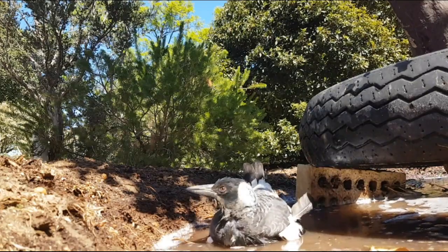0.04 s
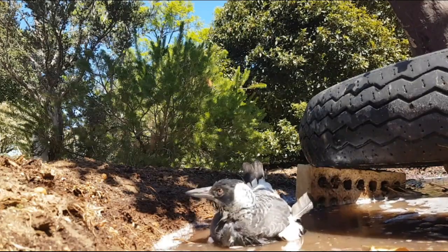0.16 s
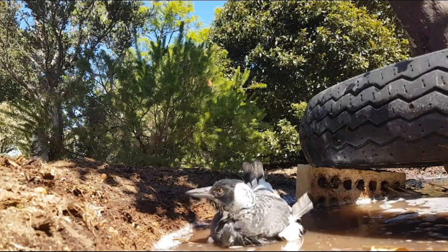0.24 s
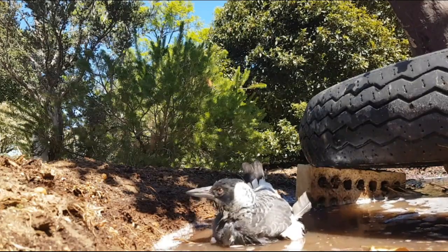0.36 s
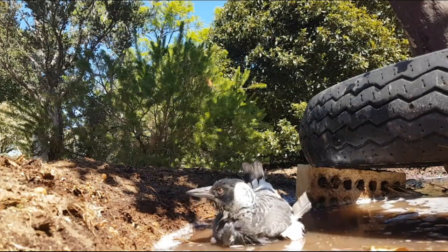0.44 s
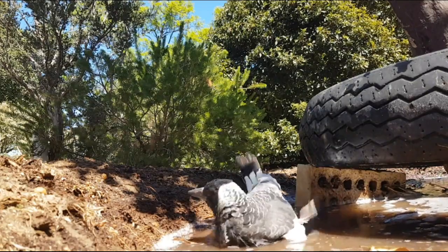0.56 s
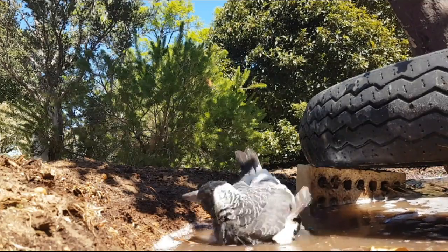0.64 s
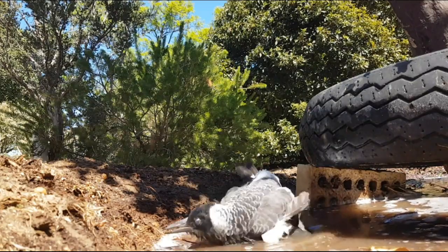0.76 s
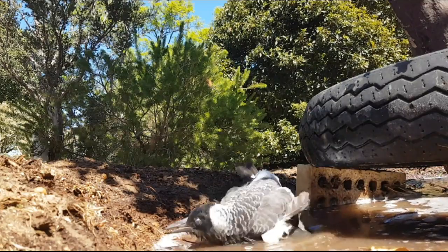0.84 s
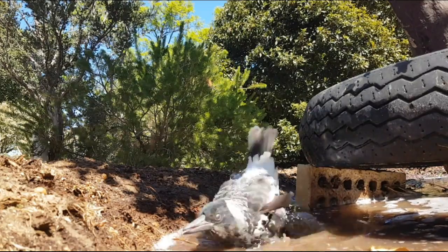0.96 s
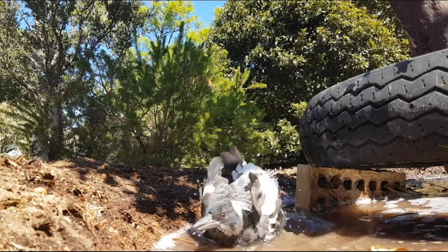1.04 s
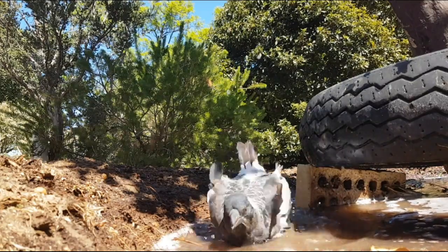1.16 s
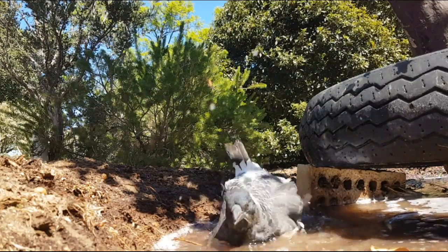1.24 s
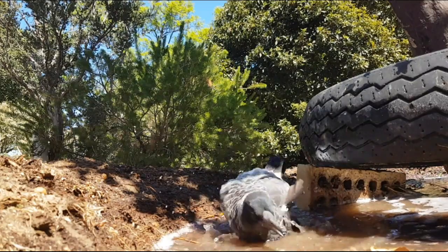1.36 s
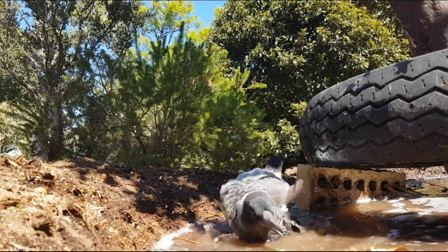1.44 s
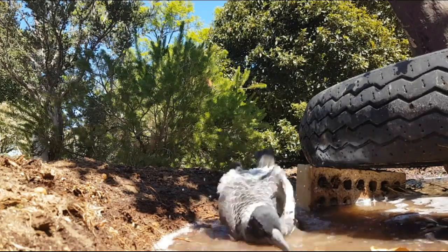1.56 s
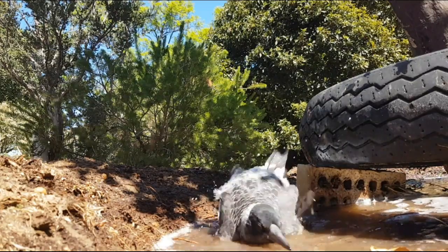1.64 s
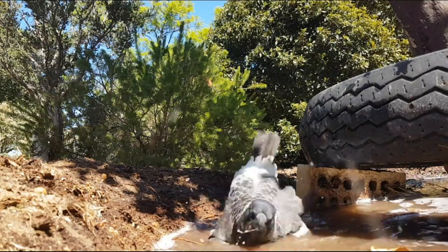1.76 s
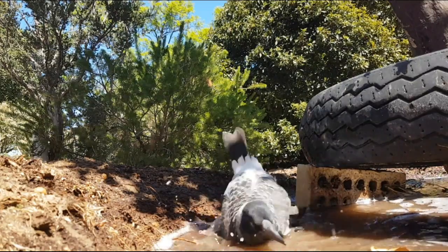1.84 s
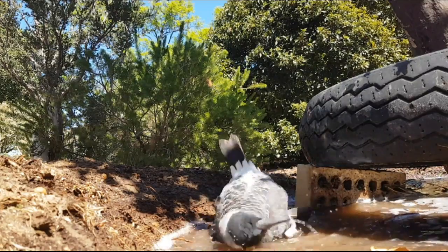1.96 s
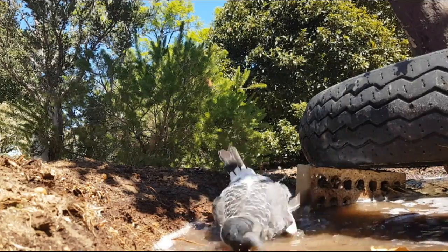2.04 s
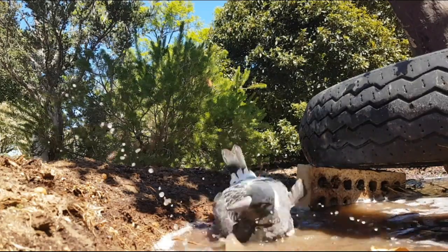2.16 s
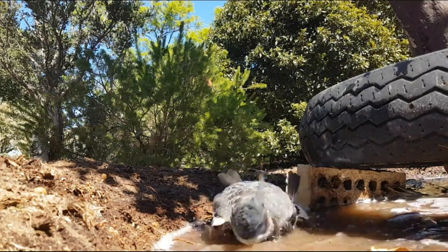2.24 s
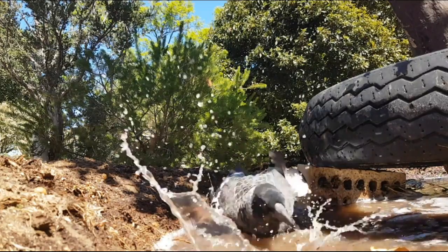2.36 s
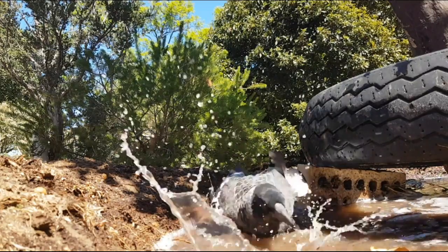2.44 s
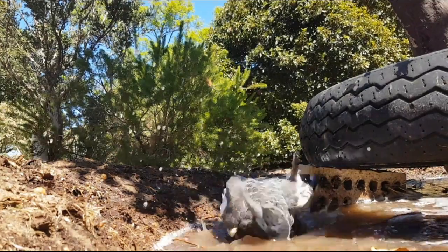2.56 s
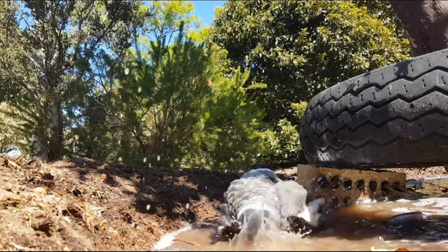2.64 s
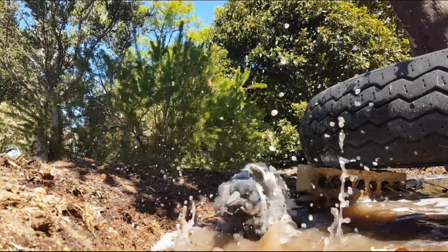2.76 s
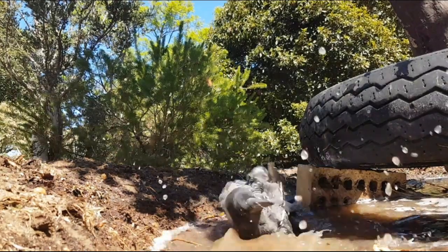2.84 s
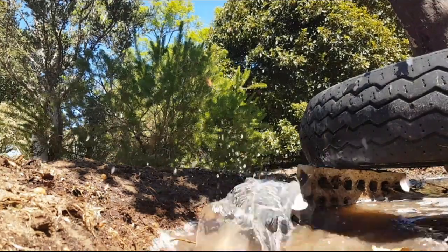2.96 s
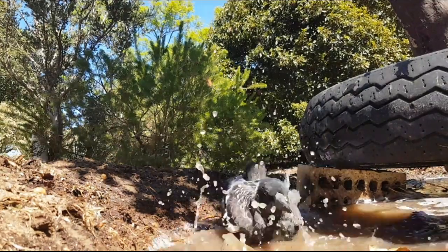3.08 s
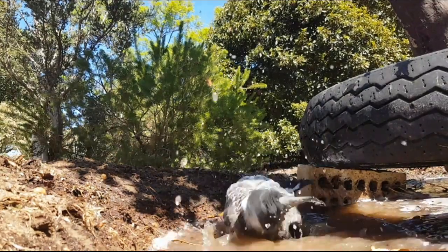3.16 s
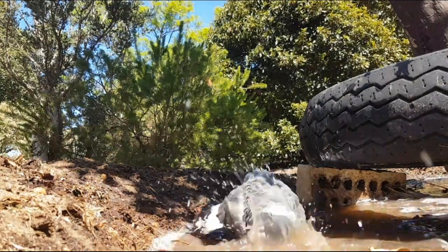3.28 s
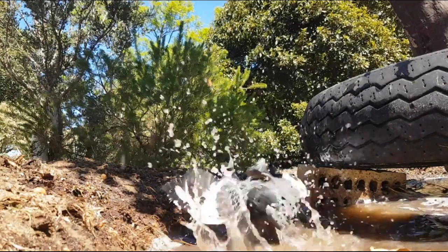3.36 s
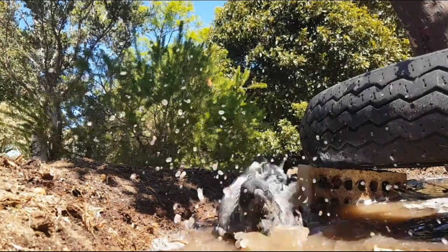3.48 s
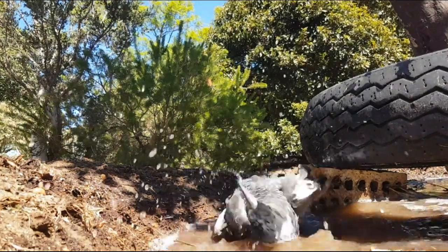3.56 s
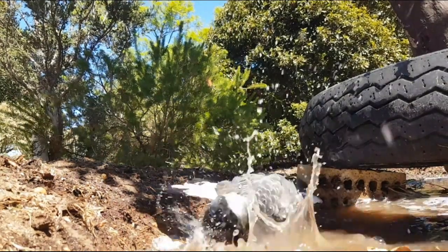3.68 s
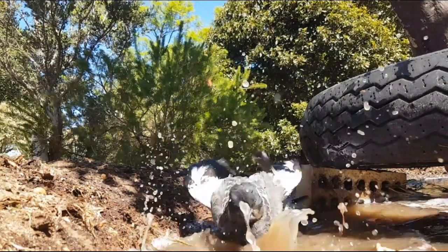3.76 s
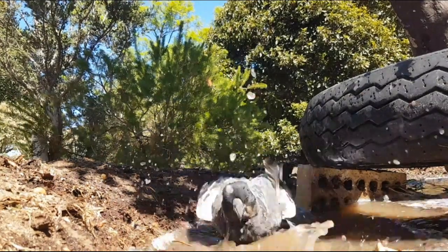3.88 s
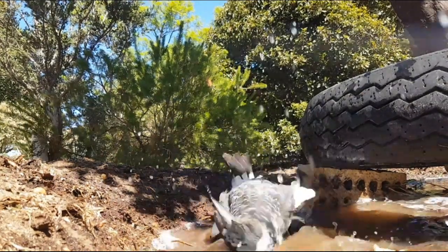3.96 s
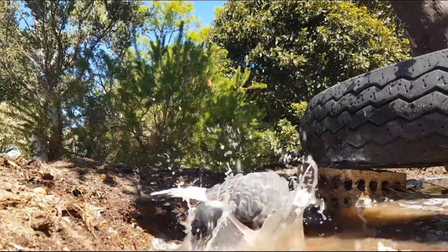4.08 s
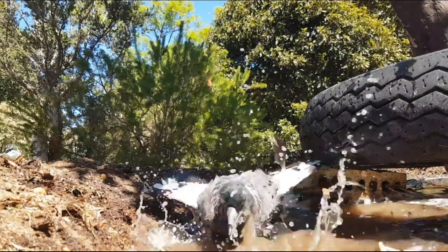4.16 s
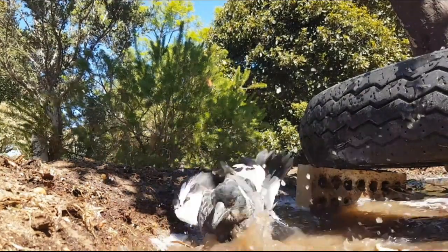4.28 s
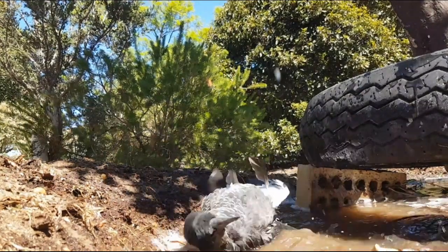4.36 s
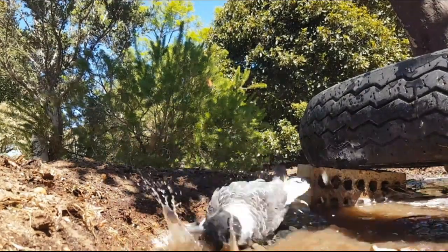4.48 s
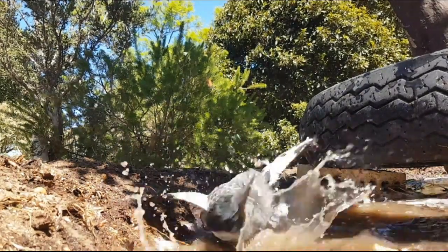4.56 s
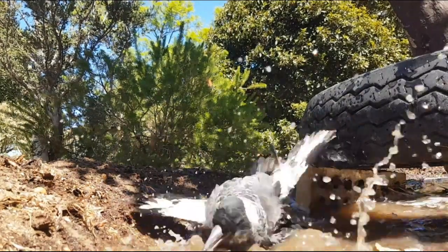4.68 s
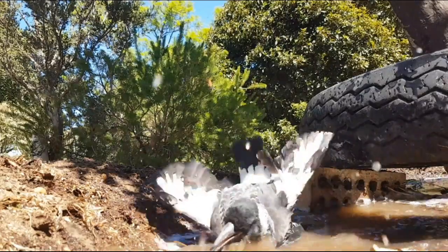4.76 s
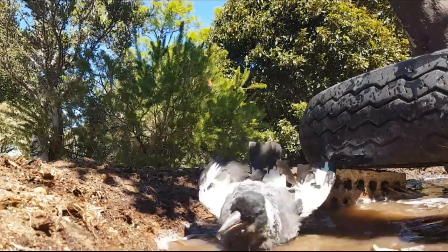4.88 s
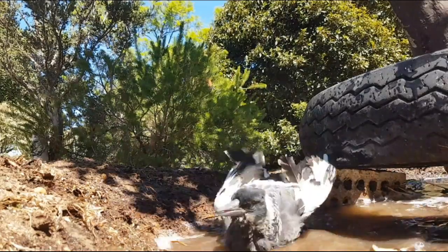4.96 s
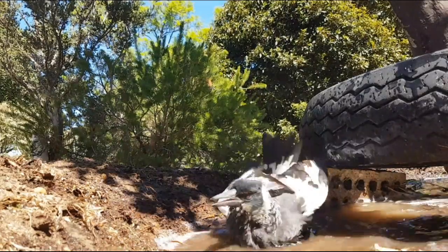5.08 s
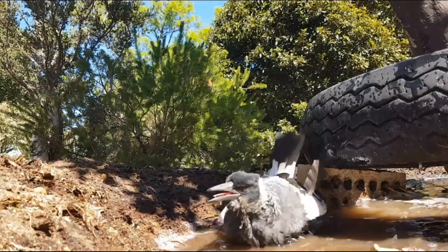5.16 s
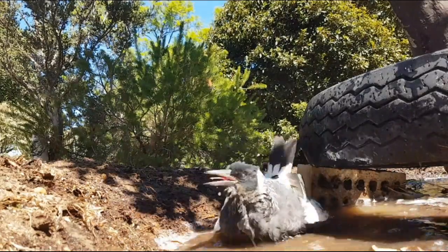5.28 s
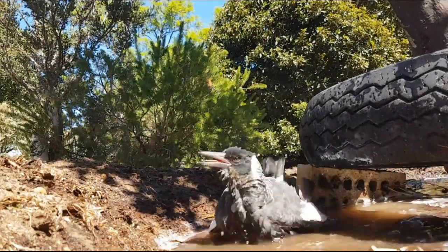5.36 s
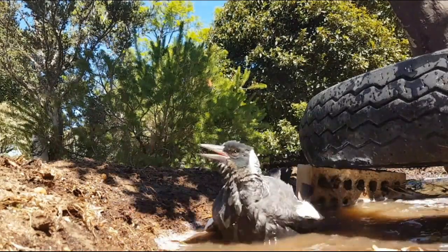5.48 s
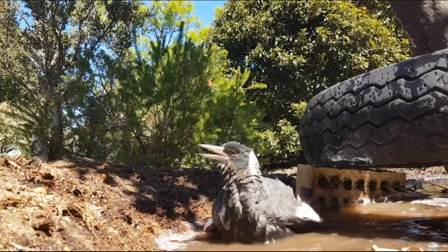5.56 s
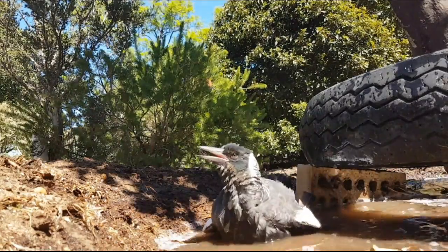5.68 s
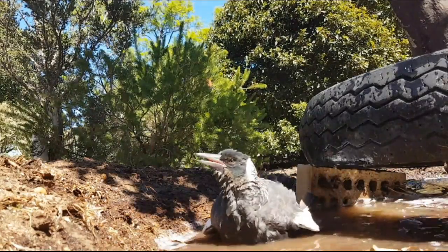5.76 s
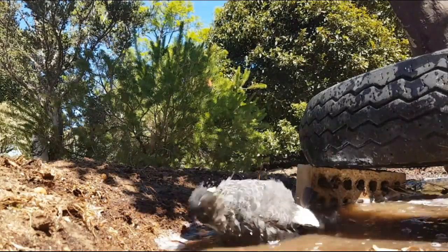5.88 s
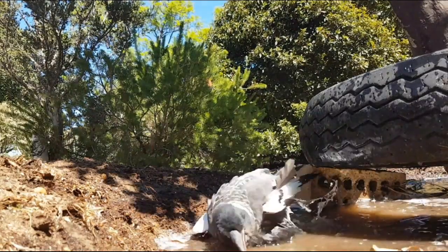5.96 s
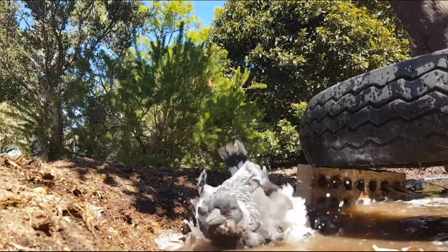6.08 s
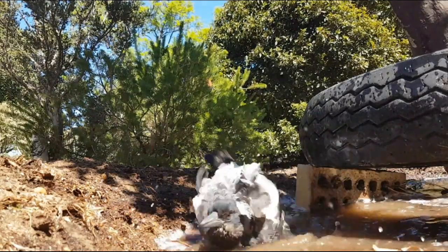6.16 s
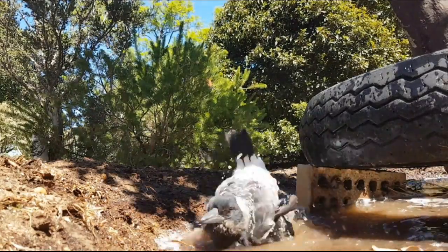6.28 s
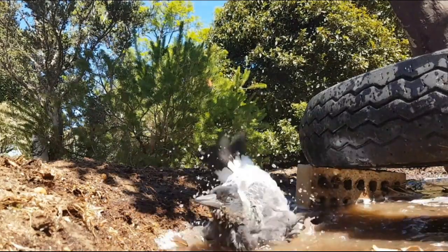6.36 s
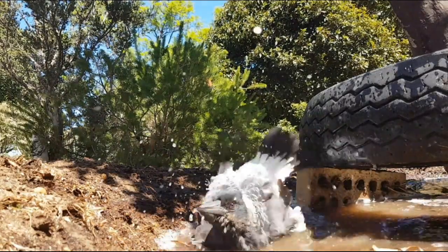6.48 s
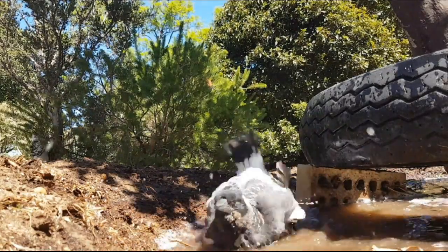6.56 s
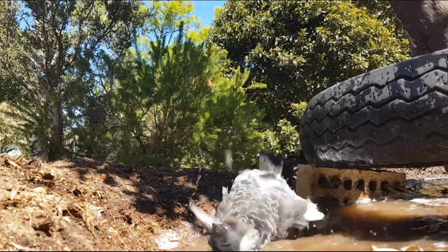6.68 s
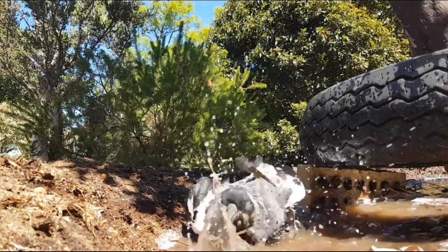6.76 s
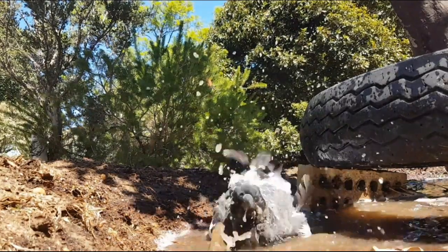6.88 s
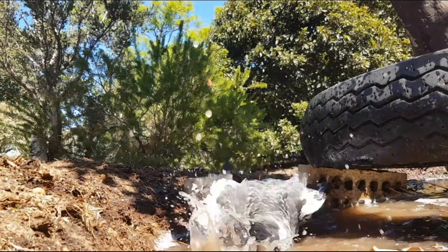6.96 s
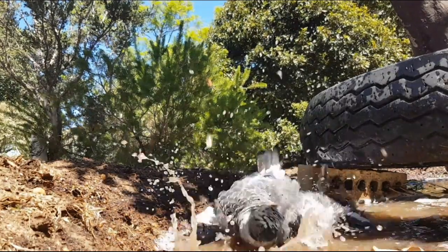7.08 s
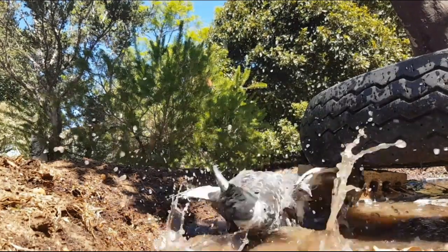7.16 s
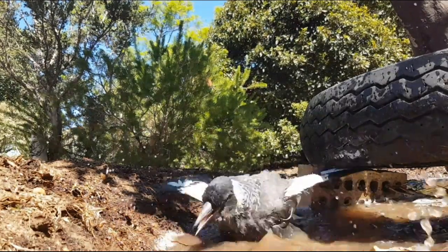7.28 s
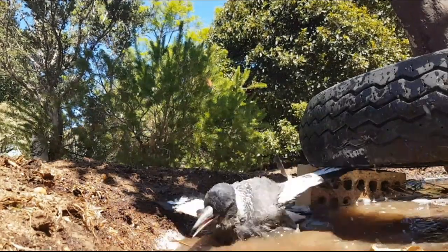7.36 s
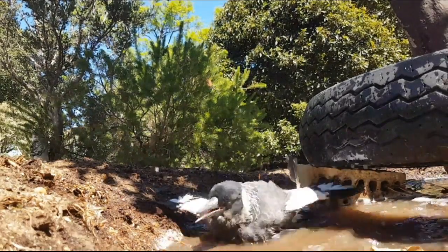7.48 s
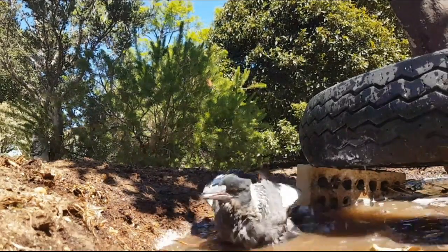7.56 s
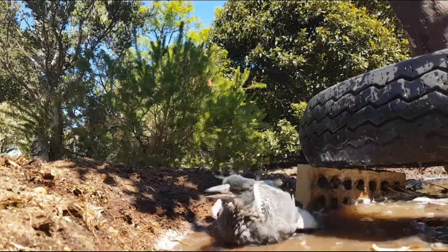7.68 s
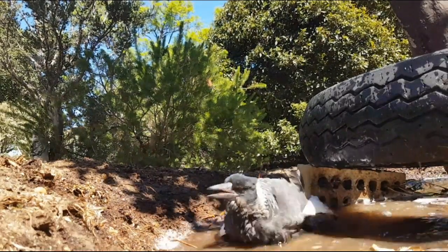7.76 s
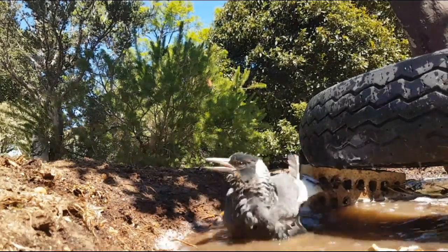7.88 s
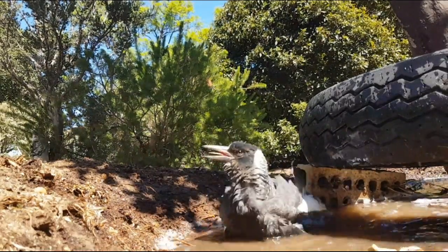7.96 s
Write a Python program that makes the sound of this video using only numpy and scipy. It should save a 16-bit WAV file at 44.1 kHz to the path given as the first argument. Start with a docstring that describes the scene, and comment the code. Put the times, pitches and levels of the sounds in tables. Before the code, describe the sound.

A bird bathes in a shallow puddle outdoors, close to a small microphone. The first second is nearly quiet, then light drips and plinks begin. At about 2 seconds a sharp wing slap hits the water, and from 2.5 to 5 seconds quick, irregular splashes follow, with low sloshing, pinging bubbles and fine spattering spray, strongest between 3.4 and 4.5 seconds. The water settles in a lull from about 5.1 to 6 seconds. A second, shorter bout builds from 6.3 seconds and ends with a clear rising plop near 7.5, followed by one small splash just before 8 seconds. A dull, fluttering background noise swells with the splashes. Far away, another bird gives very faint thin whistles around 4, 5 and 6 seconds, and a faint low hum comes up briefly around 6.3 seconds.

```python
"""Bird bathing in a puddle

A bird bathes in two bouts, close to a small microphone. Its wings slap the shallow water and trap
air, bubbles ping and spray spatters. The recorder's noise suppressor lets dull background noise up
with the splashes, and its audio coder and suppressor make that noise flutter. Far off, another bird
whistles and something hums."""
import sys
import numpy as np
from scipy import signal
from scipy.fft import rfft, irfft
from scipy.io import wavfile
from scipy.ndimage import uniform_filter1d

SR = 44100
rng = np.random.default_rng(int(sys.argv[2]) if len(sys.argv) > 2 else 0)


def inscribe(sig):
    """Save sig as 16-bit PCM at rate SR to the path in sys.argv[1].

    A 1-D sig is mono; a 2-D sig holds one channel per row.
    Samples are clipped to [-1, 1] before scaling.
    """
    pcm = np.round(np.clip(np.atleast_2d(sig).T, -1, 1) * 32767)
    wavfile.write(sys.argv[1], SR, pcm.astype(np.int16))


N = 353990


def gain_of(db):
    """Turns decibels into a factor."""
    return 10 ** (np.asarray(db) / 20)


def unit_rms(x):
    """Scales to an rms of one."""
    return x / np.sqrt(np.mean(x ** 2) + 1e-20)


def unit_band_rms(x, low_hz, high_hz):
    """Scales x so that one band of it has an rms of one."""
    power, bins = abs(rfft(x)) ** 2, np.fft.rfftfreq(len(x), 1 / SR)
    return unit_rms(x) * np.sqrt(power.sum() / power[(bins > low_hz) & (bins < high_hz)].sum())


def curve(table, column=1):
    """One column of a table over time, for every sample."""
    rows = np.vstack(table)
    return np.interp(np.arange(N) / SR, rows[:, 0], rows[:, column])


def coloured(x, spectrum):
    """Filters x by (Hz, dB) points joined on a log-frequency axis."""
    hz, db = np.transpose(spectrum)
    bins = np.fft.rfftfreq(len(x), 1 / SR)
    return irfft(rfft(x) * gain_of(np.interp(np.log(bins + 1), np.log(hz + 1), db)), len(x))


def noise(spectrum):
    """Coloured noise with an rms of one."""
    return unit_rms(coloured(rng.standard_normal(N), spectrum))


def wander(cutoff_hz):
    """Smooth random drift with an rms of one."""
    knots = rng.standard_normal(N // 100 + 2)
    lowpass = signal.butter(2, cutoff_hz, fs=SR / 100, output="sos")
    smooth = signal.sosfiltfilt(lowpass, knots, padtype="even")
    return np.interp(np.arange(N) / 100, np.arange(len(knots)), unit_rms(smooth))


def swells(base_db, rows):
    """Level in dB of a base plus the power of swells (time s, peak dB, rise dB/s, fall dB/s)."""
    t = np.arange(0, N, 50) / SR
    power = sum(gain_of(2 * (db - np.maximum(rise * (at - t), fall * (t - at))))
                for at, db, rise, fall in rows)
    return 10 * np.log10(gain_of(2 * base_db) + np.interp(np.arange(N) / SR, t, power))


def add(mix, start_s, sound):
    """Mixes a sound in at its start time."""
    part = mix[round(start_s * SR):][:len(sound)]
    part += sound[:len(part)]


# A low hum, far from the puddle: (time [s], level [dB])
HUM_LEVELS = [(5.5, -100), (5.7, -72.5), (6.15, -66), (6.3, -61), (6.5, -64), (6.7, -100), (7.5, -100),
              (7.7, -70.5), (8.03, -101)]


def far_hum(hz=192):
    """One low, wavering tone that comes up twice."""
    t = np.arange(N) / SR
    return gain_of(curve(HUM_LEVELS) + 2.5 * wander(8)) * np.sin(2 * np.pi * hz * t)


# Another bird, far off: (time [s], length [s], level [dB], start pitch [Hz], end pitch [Hz])
FAR_WHISTLES = [(.29, 0.14, -86, 4900, 4600), (.46, 0.08, -81, 4250, 4000), (4.023, 0.055, -66, 3920, 4300),
                (4.95, 0.12, -70, 4750, 4950), (5.73, 0.13, -82, 5250, 4900), (5.77, 0.22, -78, 4600, 4250),
                (5.81, 0.13, -77, 4000, 3850)]


def far_bird():
    """Thin gliding whistles; a raspy voice smears their pitch."""
    out, rasp_hz = np.zeros(N), 230 * wander(190)
    for start, length, db, from_hz, to_hz in FAR_WHISTLES:
        n = round(length * SR)
        hz = np.linspace(from_hz, to_hz, n) + rasp_hz[round(start * SR):][:n]
        add(out, start, gain_of(db) * np.hanning(n) * np.sin(2 * np.pi * np.cumsum(hz) / SR))
    return out


# Levels at the microphone between surges: (time [s], background [dB], spray [dB])
BATHING_LEVELS = [(0.0, -61.5, -94), (0.43, -63, -105), (1.05, -63, -90), (1.14, -57.5, -75),
                  (1.9, -57, -73.5), (2.4, -62, -69), (2.75, -53.5, -67.5), (3.6, -55, -66),
                  (4.3, -50.5, -65.5), (4.42, -58, -61.5), (4.9, -56.5, -69.5), (5.15, -62, -74.5),
                  (6.05, -64, -93.5), (6.35, -59, -81), (6.65, -54, -64.5), (7.05, -58.5, -77.5),
                  (7.45, -52.5, -62.5), (7.7, -61.5, -81), (8.03, -63.5, -91)]
# The body heaves and the puddle surges: (time [s], slosh [dB], background let up [dB], spray [dB])
BODY_SURGES = [(0.483, -79, -61, -92), (1.41, -69, -76, -87), (2.01, -61, -58, -64.5),
               (2.53, -54, -59, -85), (2.83, -51.5, -52.5, -70), (3.15, -56.5, -47, -77),
               (3.495, -49.5, -46.5, -62), (3.73, -71, -70, -71), (3.84, -48.5, -52, -82),
               (3.92, -78, -60, -76), (4.2, -54, -73, -82), (4.665, -52, -52.5, -84), (4.86, -60, -73, -59),
               (5.068, -53.5, -58, -86), (5.325, -66, -55.5, -88), (5.42, -78, -57, -84),
               (5.9, -85, -58.5, -76), (6.158, -84, -55.5, -71), (6.304, -73, -53.5, -63),
               (6.44, -77, -57.5, -64.5), (6.59, -64.5, -57, -78), (6.918, -59, -55.5, -84),
               (7.11, -65.5, -60, -78), (7.357, -56.5, -46.5, -59), (7.882, -66.5, -55.5, -80),
               (7.989, -90, -58.5, -71)]
SURGE_DB_PER_S = (250, 173)  # rise and fall of background and spray
# Background noise behind the puddle: (frequency [Hz], relative level [dB])
BACKGROUND_SPECTRUM = [(18, -62), (48, -29.5), (141, -17.5), (190, -9), (280, -15), (370, -2), (435, -2.5),
                       (520, -7), (640, -8.5), (1150, -15), (1550, -6.5), (2600, -16.5), (4080, -29),
                       (6700, -43.5), (16000, -41.5)]


def background_noise():
    """Dull noise that the recorder's noise suppressor lets up with each splash, at the listed times."""
    dull = unit_band_rms(noise(BACKGROUND_SPECTRUM), 170, 4500)
    base_db = curve(BATHING_LEVELS)
    let_up_db = swells(base_db, [(at, db, *SURGE_DB_PER_S) for at, _, db, _ in BODY_SURGES])
    flutter_db = np.interp(base_db, [-64, -56], [1.9, 3])
    return gain_of(let_up_db + flutter_db * wander(95)) * dull


# Gusts right on the microphone: (time [s], peak level [dB], rise and fall [dB/s])
WIND_GUSTS = [(0.54, -66, 190), (1.7, -67, 27), (2.52, -74, 38), (5.1, -78, 60), (6.84, -60, 158),
              (7.47, -86, 60)]
# Their rumble at the capsule: (frequency [Hz], relative level [dB])
WIND_SPECTRUM = [(15, -7), (30, -8), (60, -2.5), (90, 0.5), (160, -38.5)]


def wind(calm_db=-89.5):
    """Moving air rumbles on the microphone in soft gusts."""
    level_db = swells(calm_db, [(at, db, pace, pace) for at, db, pace in WIND_GUSTS])
    return gain_of(level_db) * noise(WIND_SPECTRUM)


# Water heaving in the puddle, close by: (frequency [Hz], relative level [dB])
SLOSH_SPECTRUM = [(40, -22.5), (80, -3.5), (130, 7.5), (200, 1.5), (320, 8.5), (600, -37)]


def slosh(under_background_db=17, db_per_s=(280, 340)):
    """Low lumps of water, pushed about by the bird's body."""
    heaves = [(at, db, *db_per_s) for at, db, _, _ in BODY_SURGES]
    level_db = swells(curve(BATHING_LEVELS) - under_background_db, heaves)
    return gain_of(level_db + 2.5 * wander(26)) * noise(SLOSH_SPECTRUM)


def ping(db, hz, t60, glide, attack_s):
    """A bubble's dying sine; a positive glide lifts the pitch as it nears the surface."""
    t = np.arange(round(t60 * SR) + 50) / SR
    settle_s = np.interp(db, [-31, -27], [.025, .007])  # a strong bubble levels off early
    cycles = hz * (t + glide * settle_s * (t - settle_s * (1 - np.exp(-t / settle_s))))
    climb = max(glide * min(t60, 2 * settle_s), 0)
    fade_db = 60 * (t / t60) ** (1 + .5 * climb)  # a long climb holds, then dies abruptly
    return -gain_of(db - fade_db) * (1 - np.exp(-t / attack_s)) * np.sin(2 * np.pi * cycles)


def spray_strength():
    """How much spray flies, in dB: the bathing, and more at each surge."""
    surges = [(at, db, *SURGE_DB_PER_S) for at, _, _, db in BODY_SURGES]
    return swells(curve(BATHING_LEVELS, column=2), surges)


# Fine spray falling near the microphone: (frequency [Hz], relative level [dB])
SPRAY_SPECTRUM = [(500, -12.5), (1500, -22.5), (3000, -12), (4500, -7), (7000, -7.5), (10000, -15.5),
                  (16000, -17.5)]


def fine_spray(drops_per_s=45):
    """Tiny drops land at each of 14 pitches, every one a brief tick, over a thin hiss."""
    drops = np.zeros(N)
    for hz in np.geomspace(2500, 15000, num=14):
        landings = rng.random(N) < drops_per_s / SR
        sizes = gain_of(3.2 * np.minimum(rng.exponential(1, N), 3.5))
        tick = ping(0, hz, t60=34 / hz, glide=0, attack_s=3 / hz) * np.sqrt(hz)
        drops += signal.oaconvolve(landings * sizes, tick)[:N]
    grains = unit_rms(drops) + 0.5 * rng.standard_normal(N)
    patter = unit_band_rms(coloured(grains, SPRAY_SPECTRUM), 2300, 14000)
    return gain_of(spray_strength() - 8.5 + 5.3 * wander(30)) * patter


def tiny_bubbles():
    """Short plinks, born in clumps and more often the stronger the spray."""
    out, spray_db = np.zeros(N), spray_strength()
    clumping = np.exp(1.2 * wander(120) - .7)
    births_per_s = 15 * np.clip((spray_db + 80) / 9, 0, 1) * clumping
    for hz in np.geomspace(1500, 10000, num=30):
        births = rng.random(N) < births_per_s / SR
        strengths = gain_of(3.5 * np.minimum(rng.exponential(1, N), 3.3))
        cycles, glide = rng.uniform(5, 24), rng.uniform(0, 25)
        plink = ping(-1.5 * np.log2(hz / 3500), hz, cycles / hz, glide, attack_s=.0002)
        out += signal.oaconvolve(births * strengths, plink)[:N]
    return gain_of(spray_db + 14) * out


# Sheets of spray bursting or landing around the bird, close to the microphone:
# (time [s], level [dB], 60 dB decay [s], treble tilt [dB/octave], pitch where the tilt begins [Hz])
SPRAY_SHEETS = [(1.173, -48, 0.015, -3, 2480), (1.273, -53.5, 0.24, -4, 2720),
                (1.351, -48.5, 0.026, -35, 4250), (1.3681, -46, 0.012, -7, 4290),
                (1.514, -45.5, 0.012, 1, 6940), (1.5713, -40, 0.019, -19, 4240),
                (1.9889, -25, 0.0035, -61, 2160), (2.019, -27.5, 0.0068, -52, 2840),
                (2.179, -45.5, 0.051, -2, 2600), (2.336, -49.5, 0.016, -25, 2670),
                (2.404, -50, 0.03, -14, 3133), (2.5138, -44.5, 0.019, -1, 4050),
                (2.5828, -33, 0.021, -6.5, 2590), (2.6176, -51, 0.018, -5, 3700),
                (2.7038, -43.5, 0.046, -1, 3130), (2.757, -54, 0.0056, -9, 2560),
                (2.812, -26, 0.0081, -3, 4340), (2.8769, -31, 0.048, -3, 2320),
                (3.0088, -43, 0.014, -1, 3910), (3.0313, -36, 0.012, -13, 3214),
                (3.0735, -45, 0.05, -8, 2780), (3.108, -45, 0.027, -20, 4340),
                (3.1378, -37, 0.063, -3.5, 2765), (3.157, -28.5, 0.016, 3, 2400),
                (3.2038, -32, 0.017, -4, 4320), (3.371, -19.5, 0.0064, -63, 2580),
                (3.418, -42, 0.049, -14, 2460), (3.4648, -30.5, 0.017, -8, 4340),
                (3.5183, -41.5, 0.022, -3, 2480), (3.5409, -28.5, 0.037, -1.5, 2400),
                (3.6234, -45.5, 0.047, -17, 2450), (3.645, -40, 0.018, -24, 4320),
                (3.663, -40.5, 0.03, 0, 3210), (3.711, -47, 0.017, -3, 2430),
                (3.749, -34.5, 0.035, -53, 4260), (3.762, -41, 0.01, 1, 7300),
                (3.769, -50, 0.017, -14, 3946), (3.8191, -21, 0.023, 9.5, 7800),
                (3.887, -23.5, 0.031, -1, 7350), (4.061, -32.5, 0.0075, -1, 2580),
                (4.1114, -30, 0.054, 2.5, 3080), (4.125, -31, 0.025, -11.5, 2500),
                (4.2168, -20, 0.011, 9, 3690), (4.257, -45, 0.014, 9, 2580), (4.275, -42, 0.012, 3, 6800),
                (4.2994, -34.5, 0.042, -2, 2730), (4.3812, -29, 0.011, -5, 3260),
                (4.444, -34, 0.045, -10.5, 2593), (4.5438, -40.5, 0.026, -0.5, 2440),
                (4.6567, -41, 0.011, -8, 3690), (4.671, -41, 0.024, -3, 2590),
                (4.679, -36.5, 0.0094, -33, 3310), (4.691, -35, 0.0076, -20.5, 2500),
                (4.7393, -32, 0.015, -0.5, 2550), (4.743, -29.5, 0.023, -3, 4120),
                (4.786, -38, 0.013, 2, 3676), (4.793, -47, 0.019, 1, 3300), (4.803, -40, 0.019, -1.5, 6500),
                (4.8132, -32.5, 0.012, -23, 3070), (4.8567, -49, 0.0089, -19, 2800),
                (4.871, -42, 0.011, -17, 3130), (4.939, -39, 0.052, 4, 4380), (4.9449, -33, 0.013, 6, 6100),
                (5.056, -29, 0.0048, -22, 2400), (5.074, -29.5, 0.0036, -19, 2800),
                (6.0793, -44.5, 0.0089, 3, 3300), (6.294, -43.5, 0.0099, -18, 2300),
                (6.553, -40, 0.05, 4.5, 2660), (6.565, -45.5, 0.22, -9.5, 2900),
                (6.635, -50, 0.014, -35, 3100), (6.7001, -46.5, 0.061, -13, 3880),
                (6.741, -43, 0.014, -4, 2720), (6.839, -41, 0.078, -8.5, 1896),
                (6.8777, -35.5, 0.0086, -18, 3370), (6.914, -29, 0.027, 11.5, 3760),
                (7.101, -42.5, 0.031, -1, 2440), (7.121, -41.5, 0.037, 3, 3680),
                (7.184, -22.5, 0.021, -1, 2625), (7.139, -47, 0.017, -5, 4350),
                (7.2595, -27, 0.011, -12, 5770), (7.336, -43.5, 0.044, -5, 3500),
                (7.359, -28, 0.021, 14, 2730), (7.461, -40, 0.011, -7, 5220),
                (7.586, -43.5, 0.026, -14, 3190), (7.861, -36.5, 0.048, -12.5, 2460)]


def spatters(n=4096):
    """Each sheet is a cluster of drops: a lumpy burst, sometimes ringing near where its tilt begins."""
    out, t = np.zeros(N), np.arange(n) / SR
    patch_hz = np.geomspace(1000, 16000, num=18)  # patches, bright or dull by chance
    onset = (1 - np.exp(-t / 0.00025)) * (1 + np.exp(-t / 0.001))  # the first drops crack
    lump_depth_db = 11 * (0.5 - np.exp(-t / 0.0042))
    for start, db, t60, tilt, corner_hz in SPRAY_SHEETS:
        white, lumps = rng.standard_normal((2, n))
        octaves = np.log2(patch_hz / corner_hz)
        slope_db = tilt * np.maximum(octaves, 0) + np.minimum(octaves, 0)
        ring_db = 24.3 * np.exp(-(octaves / 0.038) ** 2)  # only if a patch lies near the corner
        patch_db = slope_db + ring_db + 7.35 * lumps[-len(patch_hz):]
        burst = unit_rms(coloured(white, [(400, -6), *zip(patch_hz, patch_db)]))
        burst *= gain_of(lump_depth_db * unit_rms(uniform_filter1d(lumps, 50)))
        envelope = onset * gain_of(-60 * t / max(t60, .004))
        add(out, start, gain_of(db) * unit_rms(burst * envelope) * np.sqrt(np.mean(envelope ** 2)))
    return out


# Single bubbles in the puddle, close to the microphone:
# (time [s], level [dB], pitch at birth [Hz], 60 dB decay [s], initial glide [birth pitches/s])
BUBBLE_PINGS = [(1.1241, -38.5, 1730, 0.05, -4.6), (1.345, -38, 2090, 0.042, -2.7),
                (1.4478, -44, 1623, 0.1, -4.7), (1.492, -48.5, 2150, 0.049, 25),
                (1.8968, -31.5, 1470, 0.048, 10.9), (1.923, -40, 1044, 0.041, 13.9),
                (2.027, -39, 870, 0.051, -20), (2.0563, -37.5, 1680, 0.029, 5.2),
                (2.187, -41.5, 1122, 0.068, 26.4), (2.179, -42.5, 6500, 0.022, 1),
                (2.209, -42.5, 1996, 0.037, 15), (2.358, -47, 3800, 0.023, 1), (2.465, -41, 2400, 0.017, 1),
                (2.6383, -38.5, 1960, 0.031, -5.0), (2.68, -36, 2230, 0.014, 1),
                (2.7027, -34, 2860, 0.0078, 1), (2.718, -36.5, 6600, 0.015, 1.2),
                (2.726, -28, 1627, 0.043, -2.3), (2.812, -20, 1640, 0.0037, 1),
                (2.8798, -19.5, 2380, 0.008, 1), (3.027, -36, 1930, 0.021, 1), (3.074, -33, 1190, 0.1, 19),
                (3.081, -40.5, 1800, 0.034, 30), (3.1521, -27.5, 1120, 0.015, 1),
                (3.235, -44.5, 2380, 0.057, 15), (3.344, -34, 1720, 0.011, 5),
                (3.4684, -24, 1810, 0.019, 1), (3.52, -30, 1640, 0.0084, 5),
                (3.5439, -15.5, 2120, 0.014, -5.0), (3.665, -32, 1840, 0.023, 10),
                (3.714, -22, 1780, 0.033, 8), (3.7249, -27, 1630, 0.049, -1), (3.745, -30, 1470, 0.089, 8),
                (3.7543, -35, 2030, 0.027, 5.5), (3.765, -27, 1910, 0.032, 3),
                (3.8207, -19.5, 1390, 0.004, 1), (3.8896, -34.5, 1670, 0.025, 1),
                (3.605, -50.5, 966, 0.075, -3), (3.931, -31, 1286, 0.017, 1),
                (4.013, -26.5, 1840, 0.027, 25), (4.067, -26, 880, 0.028, -5),
                (4.0842, -27, 1650, 0.034, -5.0), (4.093, -49, 863, 0.13, 25), (4.11, -42, 887, 0.085, 40),
                (4.129, -30.5, 2420, 0.022, 1), (4.1472, -37, 1280, 0.027, 11.8),
                (4.2173, -16, 1460, 0.0054, 1), (4.2579, -33, 1840, 0.013, 1), (4.29, -48, 4900, 0.014, 1),
                (4.367, -37, 1630, 0.046, 8), (4.3976, -18, 1850, 0.026, 3.7),
                (4.421, -31.5, 3680, 0.016, 14), (4.447, -30, 1136, 0.024, 1.1),
                (4.4719, -30.5, 2490, 0.026, 1), (4.48, -27.5, 1810, 0.021, 15),
                (4.521, -40.5, 925, 0.051, -5.0), (4.5463, -34, 2170, 0.026, 2.2),
                (4.5678, -35, 1430, 0.049, 16.1), (4.591, -46, 1400, 0.013, 0.5),
                (4.7383, -27, 1270, 0.011, 1), (4.798, -39, 930, 0.032, 1), (4.895, -25, 1534, 0.039, 38),
                (4.9456, -32.5, 1340, 0.037, 50), (5.298, -40, 1670, 0.011, 1),
                (5.354, -48, 2430, 0.033, 1), (6.0788, -31, 1290, 0.0039, 1), (6.038, -43, 1510, 0.0087, 1),
                (6.128, -46, 1240, 0.11, 28), (6.349, -45, 4080, 0.017, 1), (6.425, -42, 1970, 0.023, 1),
                (6.5307, -34.5, 1350, 0.0046, 1), (6.599, -41, 1870, 0.036, 3),
                (6.618, -42, 3240, 0.026, 1), (6.635, -33.5, 1960, 0.023, -3.5),
                (6.744, -37, 1630, 0.0095, 1), (6.766, -33.5, 2010, 0.018, 7.8),
                (6.817, -45.5, 2400, 0.057, 8), (7.098, -28, 1525, 0.02, 5),
                (7.1833, -30, 1200, 0.028, 80.0), (7.2593, -39.5, 1240, 0.089, 7.3),
                (7.272, -39, 2790, 0.02, 1), (7.418, -45, 7900, 0.012, 1), (7.4583, -14.5, 1277, 0.053, 48),
                (7.557, -32.5, 1417, 0.039, -5.0), (7.8627, -34, 1660, 0.012, 1),
                (7.873, -44, 1473, 0.082, -3.4)]


def bubbles():
    """Clear pings, a little unsteady; those that climb far swell slowly as they near the surface."""
    out = np.zeros(N)
    for start, db, hz, t60, glide in BUBBLE_PINGS:
        attack_s = 0.00013 + 0.00037 * max(glide * t60, 0) ** 2
        add(out, start, ping(db, hz, max(t60, .005), glide, attack_s))
    return out * gain_of(2.6 * wander(200))


# Wings hitting the water, close to the microphone:
# (time [s], level [dB], nominal pitch [Hz], 60 dB decay [s])
WING_SLAPS = [(0.477, -51.5, 431, 0.15), (1.274, -41, 505, 0.032), (1.543, -46.5, 515, 0.17),
              (1.921, -40, 524, 0.025), (1.99, -14, 463, 0.016), (1.997, -27, 395, 0.041),
              (2.018, -16, 340, 0.012), (2.24, -49.5, 381, 0.1), (2.515, -41, 373, 0.08),
              (2.58, -39, 360, 0.032), (2.711, -44, 298, 0.032), (2.811, -25.5, 343, 0.024),
              (2.832, -24, 414, 0.0074), (2.874, -26, 496, 0.021), (2.946, -35.5, 476, 0.048),
              (3.028, -29.5, 357, 0.017), (3.071, -26, 630, 0.018), (3.137, -32.5, 363, 0.069),
              (3.252, -32.5, 446, 0.017), (3.371, -8.5, 382, 0.0087), (3.468, -21, 495, 0.033),
              (3.54, -38.5, 368, 0.086), (3.772, -37.5, 305, 0.036), (3.817, -31.5, 339, 0.055),
              (3.891, -35, 336, 0.037), (4.03, -42, 366, 0.072), (4.0717, -18.5, 559, 0.046),
              (4.115, -35, 670, 0.041), (4.216, -31.5, 343, 0.046), (4.297, -36.5, 457, 0.11),
              (4.346, -22, 466, 0.0067), (4.382, -2.5, 790, 0.018), (4.48, -35.5, 400, 0.038),
              (4.505, -37.5, 360, 0.044), (4.658, -27.5, 374, 0.01), (4.67, -19.5, 348, 0.016),
              (4.74, -43, 384, 0.022), (4.816, -31, 462, 0.043), (4.86, -41, 560, 0.044),
              (5.057, -25, 308, 0.019), (5.075, -11, 326, 0.0082), (6.421, -35, 412, 0.018),
              (6.554, -29.5, 520, 0.012), (6.697, -35, 680, 0.026), (6.7422, -19.5, 410, 0.0082),
              (6.837, -34, 374, 0.015), (6.915, -35, 378, 0.05), (7.102, -37, 384, 0.015),
              (7.159, -41.5, 408, 0.011), (7.183, -38, 556, 0.0069), (7.252, -33, 735, 0.012),
              (7.342, -27.5, 578, 0.026), (7.359, -20, 590, 0.0072), (7.372, -30.5, 323, 0.016),
              (7.424, -40.5, 327, 0.074), (7.455, -28, 496, 0.012), (7.624, -51, 331, 0.11),
              (7.86, -47, 796, 0.0087)]


def wing_slaps():
    """A tick of contact traps air; the pocket starts small, so its note drops, sags and breaks up."""
    out, wobble_db = np.zeros(N), 5 * wander(120)
    for start, db, hz, t60 in WING_SLAPS:
        t60 = max(t60, .008)
        t = np.arange(round(t60 * SR)) / SR
        drop_cycles = 0.53 * (1 - np.exp(-t / 0.00028))
        sag_cycles = hz * 0.00348 * (1 - np.exp(-t / 0.014))
        cycles = 0.78 * hz * t + sag_cycles + drop_cycles
        envelope = gain_of(-60 * (t / t60) ** 0.8) * (1 - np.exp(-t / 0.00013))
        breakup = gain_of(wobble_db[round(start * SR):][:len(t)] * np.minimum(t / .008, 1))
        pocket = envelope * breakup * np.sin(2 * np.pi * cycles)
        tick = (t / 0.00025) * np.exp(1 - t / 0.00027)
        add(out, start, -gain_of(db) * (0.64 * pocket + 0.041 * tick))
    return out


def echoes(x, t60=0.11):
    """A short scatter of reflections from the tyre, brick and ground near the puddle."""
    t = np.arange(3000) / SR
    taps = rng.standard_normal(len(t)) * (rng.random(len(t)) < .05)
    taps *= gain_of(-60 * t / t60) * (t > .002)
    return signal.oaconvolve(x, taps / np.linalg.norm(taps))[:N]


# The small microphone's response to splashes at close range: (frequency [Hz], gain [dB])
CLOSE_RESPONSE = [(20, -6), (100, -18), (250, 8), (7000, -7), (10000, -15), (16000, -32)]


def scene():
    """Close splashes with their echoes, over wind and the far sounds, in mono."""
    splashes = coloured(bubbles() + tiny_bubbles() + wing_slaps() + spatters(), CLOSE_RESPONSE)
    puddle = splashes + gain_of(-25) * echoes(splashes) + fine_spray() + slosh()
    return (puddle + wind() + background_noise() + far_hum() + far_bird())[None]


# The microphone's own hiss: (frequency [Hz], relative level [dB])
HISS_SPECTRUM = [(3000, -31.5), (8000, -10), (12000, -12.5), (16000, 0)]
HISS_DB, SUPPRESS_BELOW_DB, BAND_LIMIT_HZ = -83, -54, 16000


def record(dry):
    """The microphone adds hiss, a noise suppressor turns quiet moments down, and the top is cut off."""
    heard = dry + gain_of(HISS_DB) * noise(HISS_SPECTRUM)
    level_db = 10 * np.log10(abs(uniform_filter1d(heard ** 2, 700)) + 1e-12)
    suppressed = heard * gain_of(0.54 * np.clip(level_db - SUPPRESS_BELOW_DB, -25, 0))
    lowpass = signal.firwin(511, BAND_LIMIT_HZ, window=("kaiser", 9), fs=SR)
    return signal.oaconvolve(suppressed, lowpass[None], "same")


dry = scene()
out = record(dry)
inscribe(out)
```